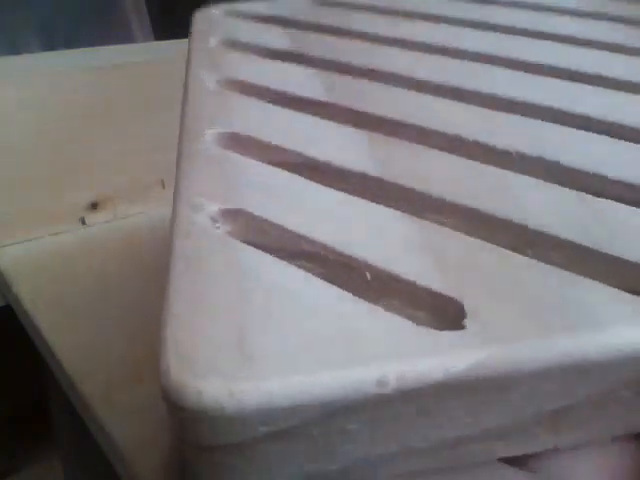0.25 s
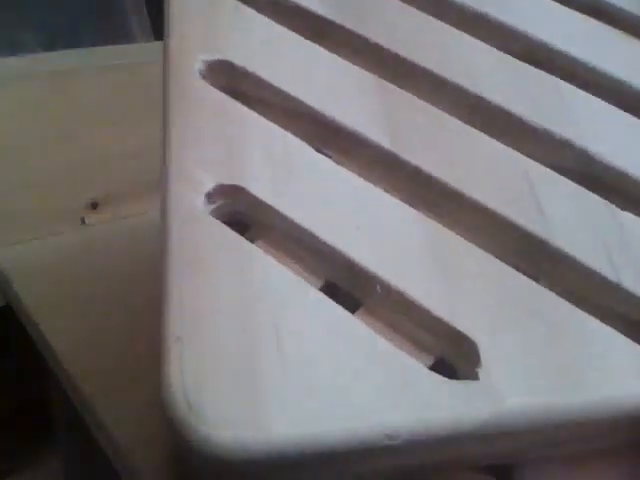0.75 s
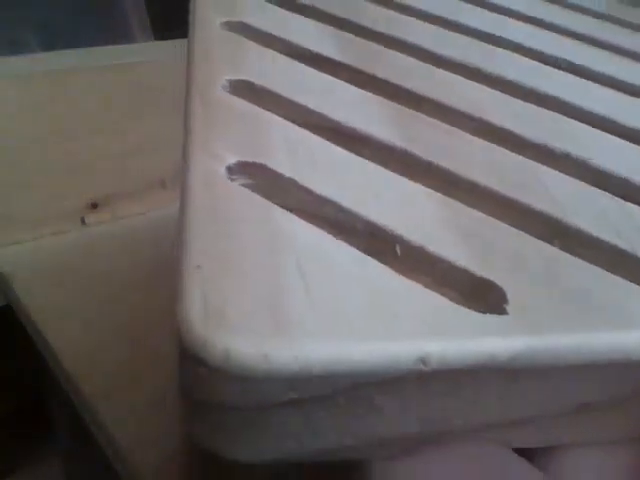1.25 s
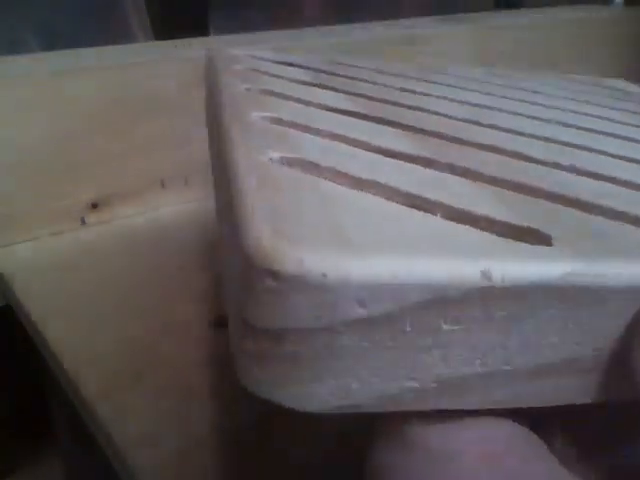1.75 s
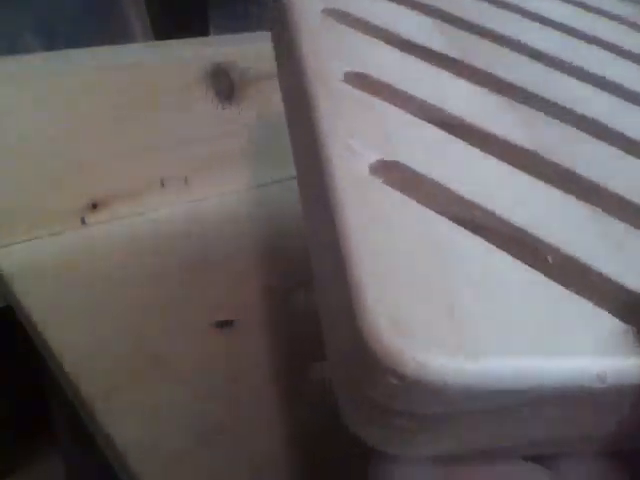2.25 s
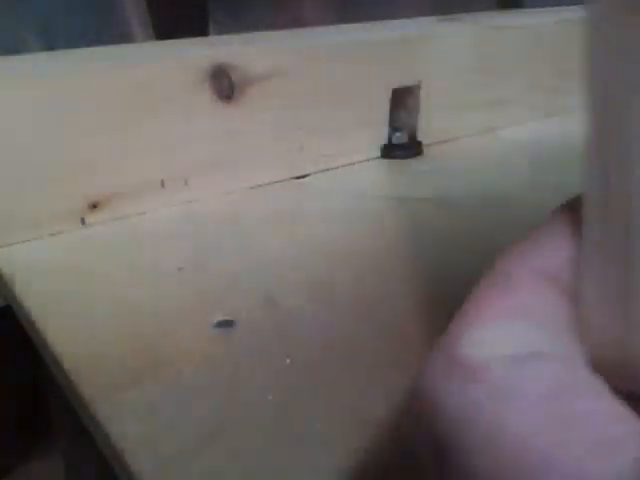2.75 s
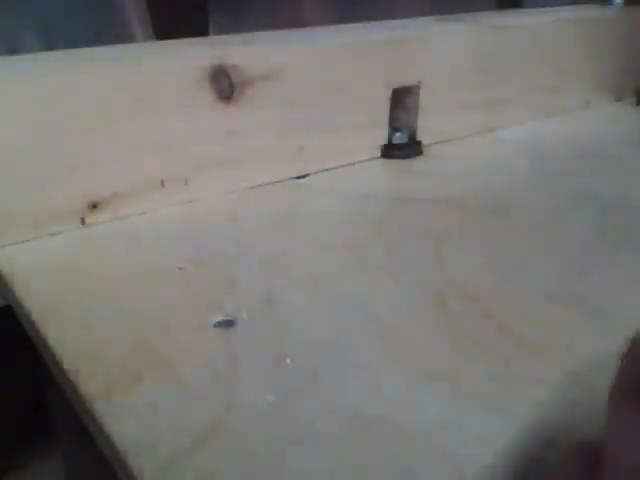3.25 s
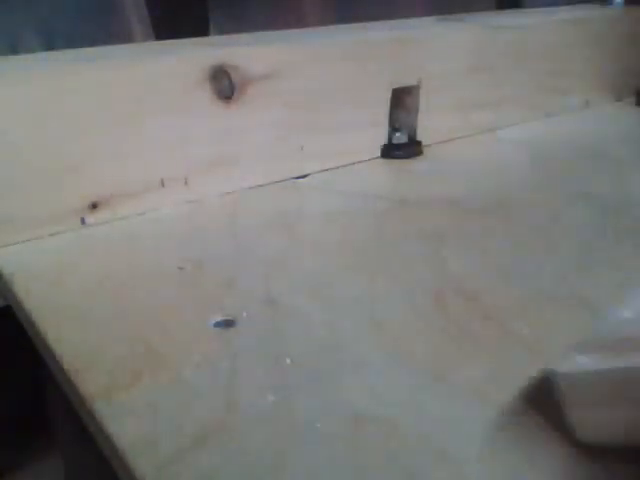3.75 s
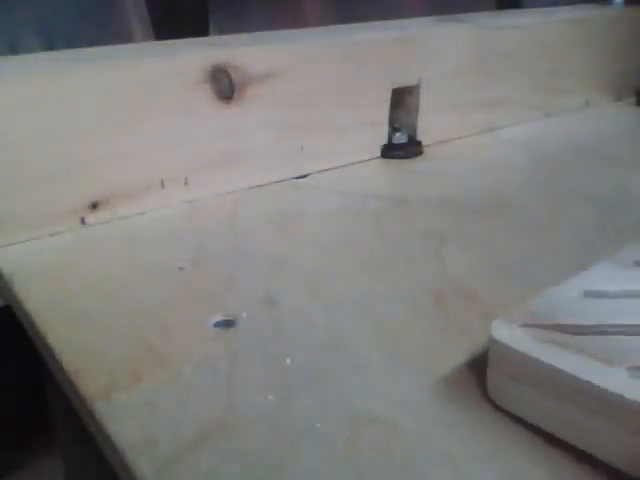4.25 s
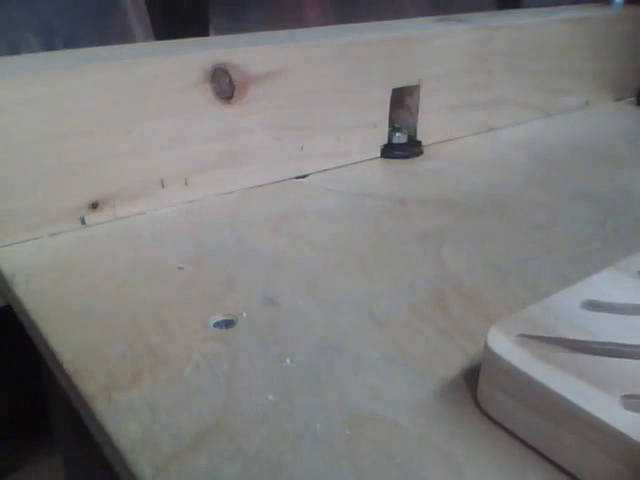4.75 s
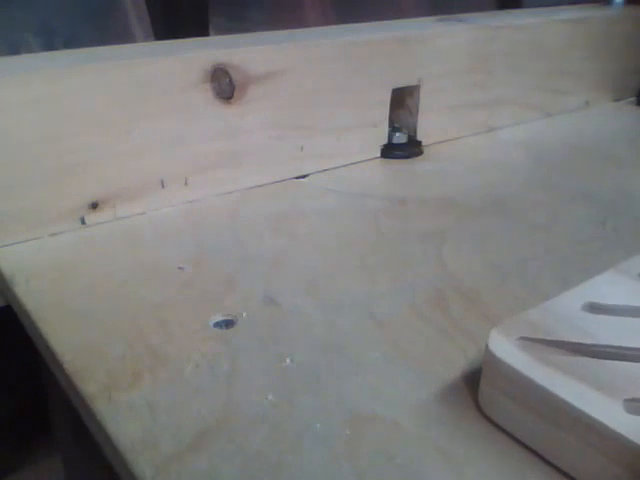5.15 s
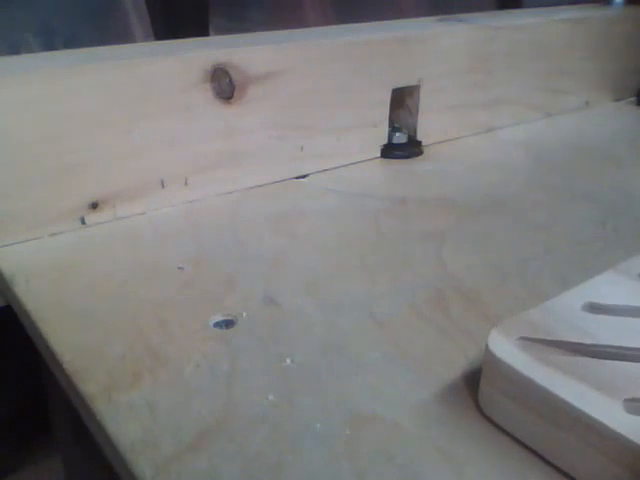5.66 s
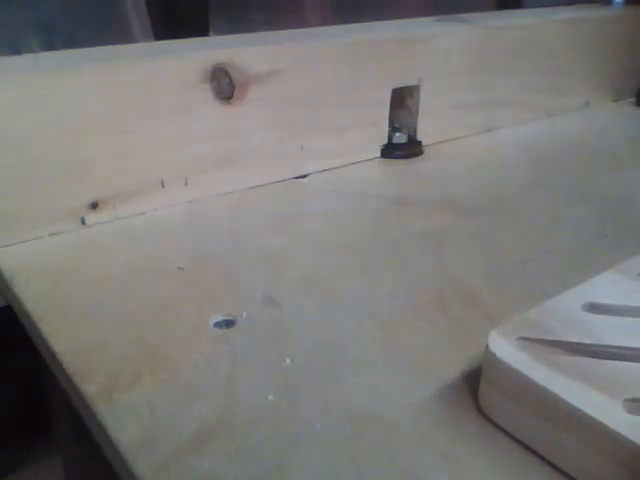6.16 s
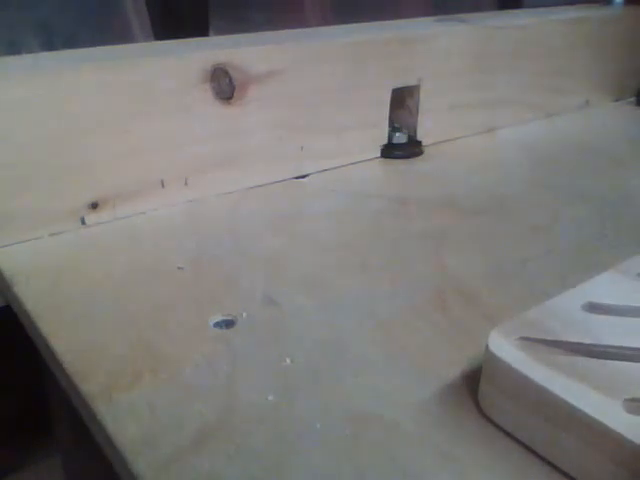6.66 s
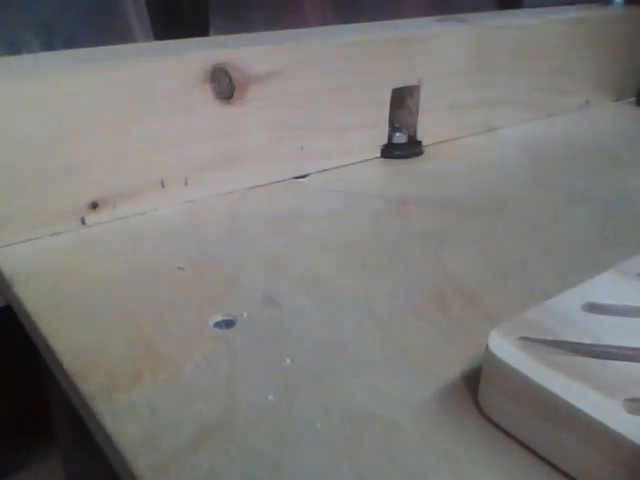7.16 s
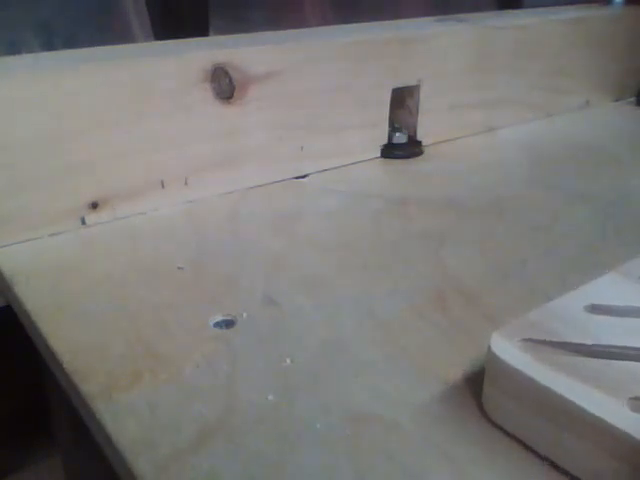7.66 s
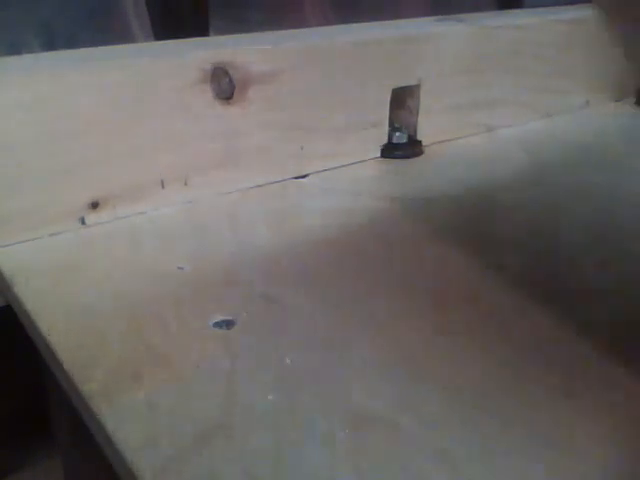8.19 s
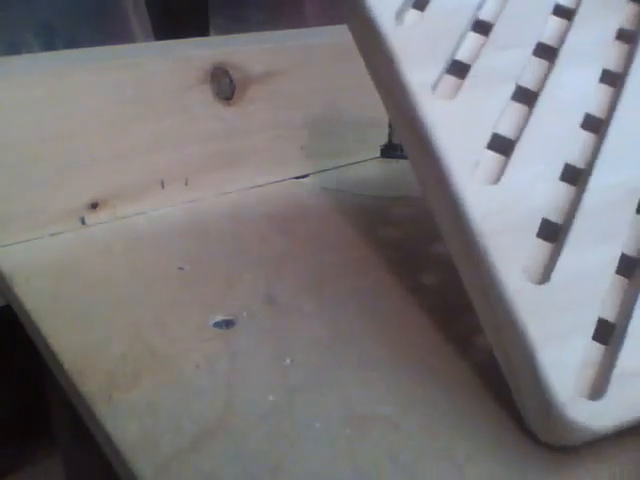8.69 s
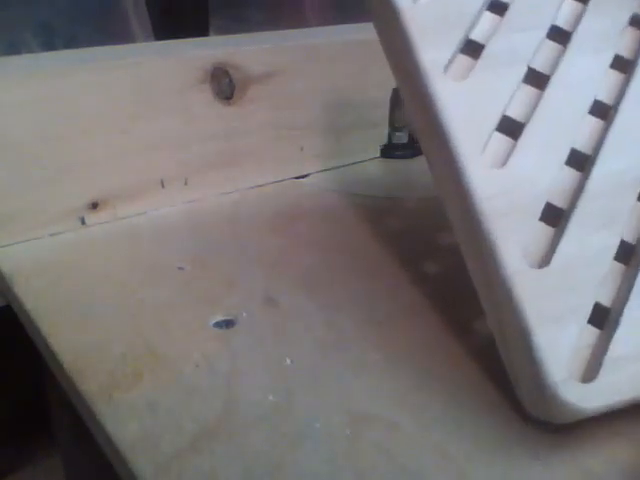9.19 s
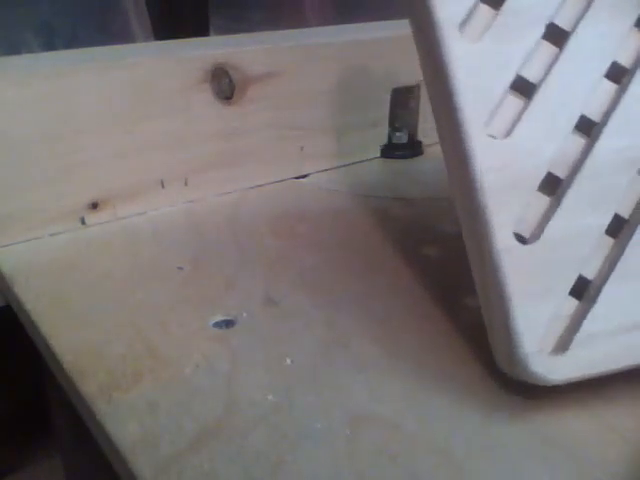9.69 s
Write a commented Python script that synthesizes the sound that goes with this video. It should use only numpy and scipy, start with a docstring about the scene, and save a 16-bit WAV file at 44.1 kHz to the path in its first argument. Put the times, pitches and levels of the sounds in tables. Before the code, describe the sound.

A router under a wooden table holds a constant mid-low buzzing tone with thinner whine and rushing cooling air, its treble shifting slightly as a board is moved near the microphone. The board knocks down hard on the table. The power then cuts and the tone sweeps steadily downward, rattling and swelling as it slows, while the air dies away. Soft wooden taps and a brief scrape follow over quiet shop noise. Close, dry, mono.

```python
"""A wood router under a table runs at full speed, is switched off and coasts down, close to one microphone.
Its shaft sings at multiples of the turning speed and sweeps down through mount, table and shroud resonances.
Cooling air roars through the housing as filtered noise; mains hum lasts while the power is on.
Near the microphone a slotted board is set down and picked up: ringing knocks, scrapes and a treble echo.
A steady shop and microphone floor with a faint electronic whistle lies behind it all."""
import sys
import numpy as np
from scipy import signal
from scipy.fft import rfft, irfft, next_fast_len
from scipy.io import wavfile
from scipy.ndimage import uniform_filter1d, map_coordinates

SR = 44100
rng = np.random.default_rng(int(sys.argv[2]) if len(sys.argv) > 2 else 0)


def generate_wav(sig):
    """Save sig (samples, or channels by samples) to the path in sys.argv[1] as 16-bit PCM at SR."""
    pcm = np.round(np.clip(np.atleast_2d(sig).T, -1, 1) * 32767).astype(np.int16)
    wavfile.write(sys.argv[1], SR, pcm)


N = 437902
TIME_S = np.arange(N) / SR

OFF_S = 5.874  # the power starts to fade
FULL_HZ = 451.9  # nominal turns a second under power
STALL_HZ = 19  # turns a second below which the fan moves no air
UNBALANCE_POWER = 1.8  # the once-a-turn shake grows with this power of speed
TABLE_BASE_DB, SHROUD_BASE_DB = -43, -48  # gain between the resonances
TOP_HZ = 15730  # upper limit of the recorded band

# Slowing, in turns/s per s: (friction, its easing times speed, fan drag times speed squared)
BRAKING = (65.2, -.1123, .0010066)
# Mount resonances shaken by the shaft: (f/Hz, width/Hz, level/dB, polarity with size)
MOUNT_MODES = [(106, 8, -18, 0.89), (164, 18.7, -8, -0.92), (269, 70, -29, -1.24), (366, 36, -19.5, -1.08),
               (437.2, 39.5, -10.5, -1.017)]
# Speeds at which the mount passes nothing: (f/Hz, half width/Hz)
DEAD_SPOTS = [(124, 5), (385, 7.3)]
# Multiples of the shaft speed; 4.39 is a bearing
ORDER_NUMBERS = [2, 3, 4, 4.39, 5, 6, 7]
# One row an order: (phase/rad, magnetic drive level/dB, its wander/dB, singing level/dB,
# mechanical level/dB, power of speed)
UPPER_ORDERS = [(0.014, -24, 1.5, -60, 1, 2.76), (-1.74, -26, 0.5, -30.5, 3.5, 3.44),
                (-0.99, -62, 2.5, -22, 0, 2.6), (0, -73, 2.5, -70, -17, 1.86),
                (-.9, -32, 3, -30.5, 0.5, 2.63), (1.9, -46, 4, -65, 0.5, 2.4),
                (-0.2, -47, 7.5, -63, -10, 2)]
# Rise and fall of the singing, added to each order's singing level: (t/s, level/dB)
SINGING = [(0, -40), (3.75, -40), (3.85, -18), (4.92, -13), (5.02, -1), (5.86, 1.5), (5.94, 6.5),
           (6.06, -9), (6.2, -40), (9.93, -60)]
# Critical speeds that wake the orders from 3 up: (f/turns a second, width/turns a second, level/dB)
RATTLES = [(122.3, 12, 12.5), (182, 16, 7), (248, 26, 7)]
# Table resonances that carry the mechanical orders: (f/Hz, width/Hz, level/dB)
TABLE_MODES = [(147, 79, -11.5), (258, 56, -6), (338, 52, -13.5), (404, 50, -14.5), (490, 48, -19.5),
               (538, 70, -22), (598, 30, -28.5), (765, 83, -32), (840, 45, -25), (929, 40, -28),
               (971, 39, -34), (1158, 47, -26), (1380, 130, -36), (2140, 160, -35.5)]
# Fan or commutator tones: (order, level/dB before the shroud, power of speed)
BLADES = [(19, 0, 2), (38, 0, 5)]
# Shroud resonances that carry the blade whistle: (f/Hz, width/Hz, level/dB)
SHROUD_MODES = [(2200, 160, -30), (2850, 150, -36), (4300, 240, -29), (5400, 300, -39), (6150, 500, -33),
                (6950, 450, -31), (8100, 600, -23.5), (11700, 2400, -30.5)]
# Air parts rumble, roar, rasp, rush, hiss, fizz:
# (full-speed level/dB before the treble changes, power of speed, share of the shading)
AIR_PARTS = [(-32.5, 1.52, 0), (-19.5, 1.89, -0.034), (-24, 2.01, 0), (-27.5, 2.8, 0.26),
             (-23.5, 3.1, 0.0088), (-27.5, 3.6, 0.85)]
# Where one air part hands over to the next: f/Hz
AIR_SPLITS_HZ = [520, 1500, 3500, 6700, 10300]
# Housing resonances, relative within each air part: (f/Hz, width/Hz, level/dB per Hz)
HOUSING_MODES = [(163, 25, -59.5), (400, 165, -55.5), (663, 170, -54), (807, 49, -45.5), (934, 162, -42.5),
                 (1142, 123, -46.5), (1350, 59, -55), (1725, 70, -52.5), (2080, 190, -50.5),
                 (2301, 270, -45.5), (2743, 245, -50.5), (3196, 270, -57.5), (3420, 93, -59),
                 (3777, 120, -59), (4273, 144, -58), (4580, 110, -72), (5000, 125, -60), (5340, 200, -64.5),
                 (6040, 220, -57.5), (7370, 1450, -61), (8250, 710, -53), (8640, 610, -55),
                 (9540, 1150, -55.5), (12160, 2300, -56.5)]
# Broad air spectrum between them, on the same scale: (f/Hz, level/dB per Hz)
HOUSING_BASE = [(30, -100), (60, -78), (110, -60.5), (300, -63), (1500, -51), (3000, -61), (7000, -67.5),
                (13000, -62), (15700, -62)]
# Treble as board and hands move: (t/s, shading/dB, rasp level/dB, hiss level/dB, blade whistle level/dB)
TREBLE = [(0, -11, 2, -3, -1), (.2, -10, 2.5, 0.5, 4), (.4, -7, 0.5, -1.5, -1), (.85, -11, -1, -2, -13),
          (1.2, -7, 1.5, -2.5, 2), (1.65, -6, 2, 0, 0), (2, -7, 0.5, -0.5, 0), (2.16, -10, 1.5, 2, -1),
          (2.45, -5, -3, -2, -11), (2.75, -1.5, 0.5, -.5, -10), (3.2, 1, 1.5, -0.5, -3),
          (3.55, -0.5, 0, 0, 5), (4.1, 1.5, 0, -0.5, 0), (4.7, -2.5, -2, 0.5, 2), (5, 0.5, -1, -1.5, -10),
          (5.4, 0.5, -0.5, 0.5, -1), (5.8, 0, 2, -0.5, -3), (5.9, -2, 0.5, 0.5, -1), (8.3, 9, -0.5, -1, 0),
          (8.65, -2, -0.5, -1, 0), (9.93, -4, -2, -5, 0)]
# Echo off the board near the microphone: (t/s, delay/ms, strength 0-1)
BOARD_ECHO = [(0, 0.25, 0), (.3, 0.23, 0), (.7, .4, 0.2), (1.1, 0.43, 0.1), (1.7, 0.35, 0.2),
              (2.2, 0.28, 0), (2.45, 0.26, 0.3), (2.7, 0.5, 0), (9.93, 0.25, 0.2)]
# Magnetic hum: (f/Hz, mean level/dB)
HUM_TONES = [(120, -41.5), (240, -50), (360, -42)]
# Board contacts: (t/s, level/dB, thud level/dB relative to it,
# hardness/dB gained two octaves above the main mode)
KNOCKS = [(3.452, -15, -40, -6), (3.7942, 1.5, -34, 7), (3.8178, -4, -36, 10), (7.5495, -12, -40, -7),
          (7.5565, -18, -36, -3), (7.9645, -21, -36, -3), (7.969, -17, -36, -2), (7.9835, -19, -36, -2),
          (7.992, -23, -36, 3), (7.998, -22, -36, 9), (8.006, -26, -36, 10), (8.376, -28, -22, 11),
          (8.3827, -23, -16, 11)]
# Board modes, the main one second: (f/Hz, level/dB before hardness, 60 dB decay/s)
BOARD_MODES = [(430, -16, .02), (620, 0, .035), (785, -2, .03), (1050, -7, .022), (1300, -9, .02),
               (1800, -12, .016), (2300, -16, .012)]
# Board dragged off the table, then turned in the hand: (middle t/s, length/s, level/dB, top f/Hz)
SCRAPES = [(8.01, .07, -43, 3500), (9.16, 0.24, -54, 4500), (9.8, .2, -57, 1500)]
# Shape of the shop and microphone floor: (f/Hz, relative level/dB)
FLOOR_SHAPE = [(20, -10), (45, -12), (80, 5), (150, -7), (300, -12), (850, -1), (1300, -26), (1450, -1),
               (1900, -13.5), (3000, -20.5), (6000, -21.5), (10000, -23), (15700, -26)]


def shaft_speed():
    """Turns a second: full speed, then braked by friction and fan drag; it hunts slightly."""
    hz = np.linspace(FULL_HZ, 0, 2000)
    friction, easing, drag = BRAKING
    slowing = friction + easing * hz + drag * hz ** 2
    reached_s = OFF_S + np.cumsum((hz[0] - hz[1]) / slowing)
    hunting = .0004 * wobble(25) + .0005 * wobble(1.5) * power_on()
    return np.interp(TIME_S, reached_s, hz) * (1 + hunting)


def power_on():
    """Motor power: 1 until the switch, then a straight fade over 49 ms."""
    return np.clip((OFF_S - TIME_S) / 0.049 + 1, 0, 1)


def unbalance(speed, angle):
    """Once-a-turn shake through the mount's resonances; mains torque ripple puts sidebands on it."""
    ripple = 2 * np.pi * HUM_TONES[0][0] * TIME_S
    upper = amp(-36.5) * np.cos(angle + ripple)
    lower = amp(-44.0) * np.cos(angle - ripple)
    response = 0
    for center, width, db, polarity in MOUNT_MODES:
        damping = 1j * speed * width
        response = response + polarity * amp(db) * damping / (center ** 2 - speed ** 2 + damping)
    gain = np.abs(response)
    for center, half_width in DEAD_SPOTS:
        gain = gain * np.abs(speed - center) / np.hypot(speed - center, half_width)
    force = (speed / FULL_HZ) ** UNBALANCE_POWER * amp(0.19 * wobble(8))
    return np.sqrt(2) * (power_on() * (upper + lower) + gain * force * np.cos(angle))


def whine(speed, angle):
    """Upper shaft orders, driven magnetically, singing and sweeping through the table's resonances."""
    out = np.zeros(N)
    singing_db = curves(SINGING)[0]
    rattle_db = sum(db * np.exp(-(2 * (speed - c) / w) ** 2) for c, w, db in RATTLES)
    for order, row in zip(ORDER_NUMBERS, UPPER_ORDERS):
        phase, drive_db, wander_db, sing_db, mechanical_db, power = row
        flutter_db = min(.15 * order ** 2, 1.8) * wobble(14)  # higher orders flutter more, up to a limit
        drive = power_on() * amp(drive_db + wander_db * wobble(2.5))
        singing = amp(sing_db + singing_db)
        mechanical = amp(mechanical_db + rattle_db * (order > ORDER_NUMBERS[0]))
        mechanical = mechanical * (speed / FULL_HZ) ** power
        mechanical = mechanical * swept(TABLE_MODES, TABLE_BASE_DB, order * speed)
        size = np.sqrt(2) * amp(flutter_db) * np.sqrt(drive ** 2 + singing ** 2 + mechanical ** 2)
        out += size * np.cos(order * angle + phase)
        if order == 4.39:
            out += .5 * size * np.cos((order - 1) * angle)  # one turn below the bearing tone
    tenth = power_on() * amp(-41 + 3.5 * wobble(7.5)) * np.cos(10 * angle)
    return out + tenth


def blade_whistle(speed, angle):
    """Blade tone and its octave through the shroud; brush arcing unsettles them more under power."""
    flutter_db = (1 + 2.5 * power_on()) * wobble(22) + curves(TREBLE)[-1]
    out = np.zeros(N)
    for order, db, power in BLADES:
        size = np.sqrt(2) * amp(db + flutter_db) * (speed / FULL_HZ) ** power
        out += size * swept(SHROUD_MODES, SHROUD_BASE_DB, order * speed) * np.cos(order * angle)
    return out


def air(speed, angle):
    """Turbulent cooling air, lightly chopped once a turn; its treble dies first as the fan slows."""
    flow = patchy(patchy_db=1.5) * (1 + 0.09 * np.cos(angle))
    pace = np.clip((speed - STALL_HZ) / (FULL_HZ - STALL_HZ), 0, 2)
    shading_db, rasp_db, hiss_db, _ = curves(TREBLE)
    extra_db = {2: rasp_db, 4: hiss_db}  # by part number
    out = np.zeros(N)
    for part, (db, power, share) in enumerate(AIR_PARTS):
        noise = unit(filtered(flow, lambda hz: housing(hz) * air_band(hz, part)))
        level_db = db + share * shading_db + extra_db.get(part, 0) + 0.43 * wobble(4)
        out += amp(level_db) * pace ** power * noise
    return out


def air_band(hz, part):
    """Gain that picks one part of the air noise, between its two handover frequencies."""
    def below(split_hz):
        return 1 / (1 + (hz / split_hz) ** 8)

    upper = below(AIR_SPLITS_HZ[part]) if part < len(AIR_SPLITS_HZ) else 1
    lower = below(AIR_SPLITS_HZ[part - 1]) if part > 0 else 0
    return upper - lower


def housing(hz):
    """Gain of the housing's resonances over the broad base."""
    return peaks(HOUSING_MODES, along(HOUSING_BASE, hz), hz)


def reflected(x):
    """The board held near the microphone mirrors the treble: a comb that sweeps as it turns."""
    delay_ms, strength = curves(BOARD_ECHO)
    treble = filtered(x, lambda hz: hz ** 4 / (hz ** 4 + 7600.0 ** 4))
    echo = map_coordinates(treble, [np.arange(N) - delay_ms * SR / 1000], mode="nearest")
    return x + strength * echo


def cabinet(x):
    """Short dense echoes under the table comb the middle treble into narrow fixed bands."""
    t = np.arange(SR // 10) / SR
    tail = rng.standard_normal(len(t)) * amp(-60 * t / .05)  # 60 dB down in 50 ms
    echoes = signal.fftconvolve(x, tail / np.linalg.norm(tail))[:N]
    return x + .3 * filtered(echoes, lambda hz: np.exp(-(np.log((hz + 1) / 4500) / .5) ** 2))


def hum():
    """Magnetic hum at twice the mains frequency and its multiples, while the power is on."""
    out = np.zeros(N)
    for hz, db in HUM_TONES:
        out += np.sqrt(2) * amp(db + 1.3 * wobble(7)) * np.sin(2 * np.pi * hz * TIME_S)
    return power_on() * out


def knocks():
    """Each contact rings the board and thumps the table; hard contacts wake the upper modes."""
    out = np.zeros(N + SR)
    t = np.arange(SR // 5) / SR
    main_hz = BOARD_MODES[1][0]
    for start_s, db, thud_db, hard_db in KNOCKS:
        ring = np.zeros(len(t))
        for hz, mode_db, t60 in BOARD_MODES:
            tilt_db = hard_db * np.log(hz / main_hz) / np.log(4)
            level_db = mode_db + tilt_db + rng.normal(0, 1) - 60 * t / t60
            ring += amp(level_db) * np.sin(2 * np.pi * hz * t)
        thud = amp(thud_db) * (t / .002) * np.exp(1 - t / .002)  # one push, largest at 2 ms
        onset = 1 - np.exp(-t / .0006)
        out[round(start_s * SR):][:len(t)] += amp(db) * (ring * onset - thud)
    return out[:N]


def scrape():
    """Rough wood-on-wood friction: gritty noise that swells and fades with each slide."""
    grit = rng.standard_normal(N) * amp(4 * wobble(250))
    out = np.zeros(N)
    for middle_s, length_s, db, top_hz in SCRAPES:
        swell = np.exp(-(2 * (TIME_S - middle_s) / length_s) ** 4)
        rub = unit(filtered(grit, lambda hz: hz / (600 + hz) / (1 + (hz / top_hz) ** 4)))
        out += amp(db) * swell * rub
    return out


def background():
    """Steady shaped noise of shop and microphone, with a faint electronic whistle."""
    noise = unit(filtered(rng.standard_normal(N), lambda hz: amp(along(FLOOR_SHAPE, hz))))
    electronic = amp(-68 + wobble(6)) * np.sin(2 * np.pi * 12764 * TIME_S)
    return amp(-46.5) * noise + electronic


def amp(db):
    """dB to gain."""
    return 10 ** (np.asarray(db) / 20)


def unit(x):
    """Scaled to rms 1."""
    return x / np.sqrt(np.mean(x ** 2) + 1e-20)


def along(points, hz):
    """Values between (f/Hz, value) points on a log frequency axis."""
    f, values = np.transpose(points)
    return np.interp(np.log(hz + 1), np.log(f + 1), values)


def curves(rows):
    """One value per sample for each column after the time."""
    s, *columns = np.transpose(rows)
    return [np.interp(TIME_S, s, column) for column in columns]


def wobble(rate):
    """A smooth random curve, rate knots a second."""
    knots = rng.standard_normal(int(N * rate / SR) + 4)
    return map_coordinates(knots, [np.arange(N) * rate / SR])


def filtered(x, response):
    """x times a response of frequency."""
    m = next_fast_len(N + 8192)
    return irfft(rfft(x, m) * response(np.fft.rfftfreq(m, 1 / SR)), m)[..., :N]


def patchy(patchy_db):
    """White noise with drifting patches of gain in time and frequency."""
    z = signal.stft(rng.standard_normal(N), nperseg=512)[2]
    field = uniform_filter1d(rng.standard_normal(z.shape), size=3, axis=0)
    field = uniform_filter1d(field, size=60, axis=1)
    return signal.istft(z * amp(patchy_db * unit(field)), nperseg=512)[1][:N]


def peaks(table, base_db, hz):
    """Gain of steep-sided resonances over a base, summed as power."""
    power = sum(amp(db) ** 2 / (1 + (2 * (hz - c) / w) ** 4) for c, w, db in table)
    return np.sqrt(power + amp(base_db) ** 2)


def swept(table, base_db, hz):
    """Gain met by a tone that glides through the resonances."""
    grid = np.geomspace(50, SR / 2, 1500)
    return np.interp(hz, grid, peaks(table, base_db, grid))


def scene():
    """Router, board and background at one microphone, which feeds both channels."""
    speed = shaft_speed()
    angle = 2 * np.pi * np.cumsum(speed) / SR
    tones = unbalance(speed, angle) + whine(speed, angle) + blade_whistle(speed, angle) + hum()
    roar = cabinet(reflected(air(speed, angle)))
    mono = tones + roar + knocks() + scrape() + background()
    return np.array([mono, mono])


def record(dry):
    """Microphone chain: bass cut below 60 Hz, clipping at full scale, band limit."""
    x = filtered(dry, lambda hz: 1j * hz / (60 + 1j * hz))
    x = x / (1 + np.abs(x) ** 12) ** (1 / 12)  # clips with a slightly rounded knee
    return filtered(x, lambda hz: hz < TOP_HZ)


dry = scene()
out = record(dry)
generate_wav(out)
```